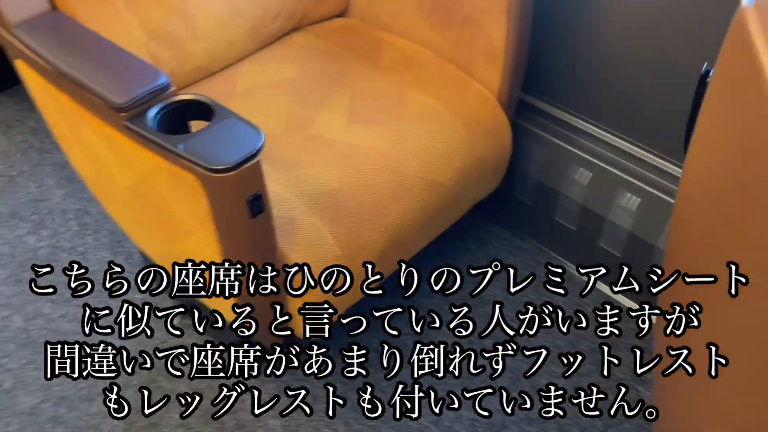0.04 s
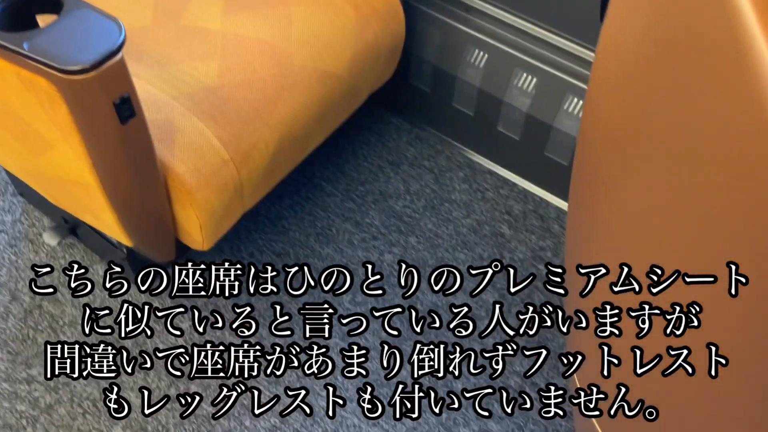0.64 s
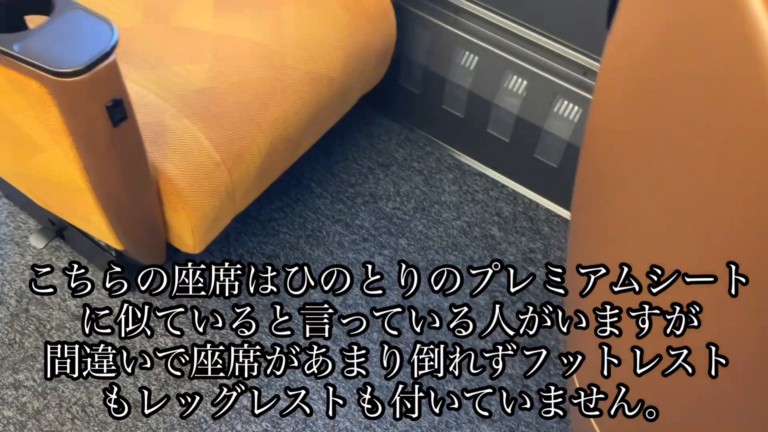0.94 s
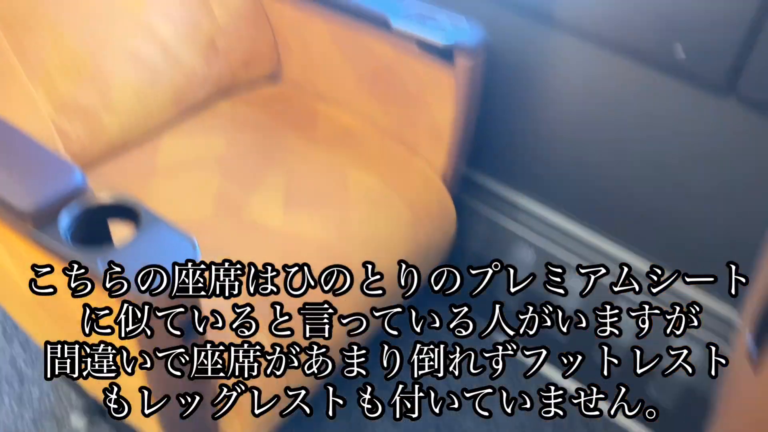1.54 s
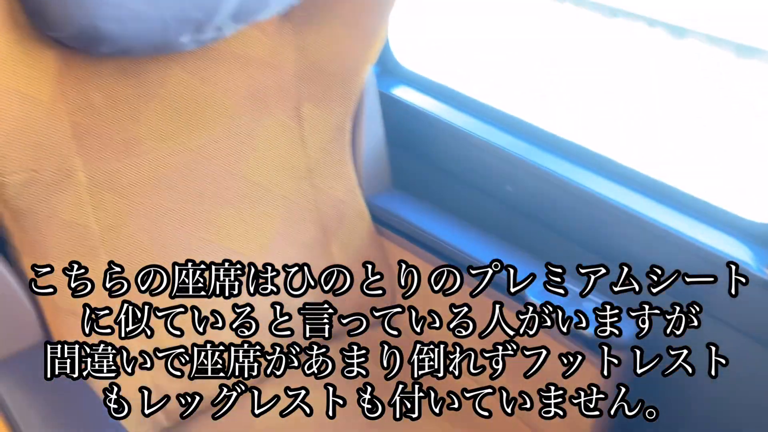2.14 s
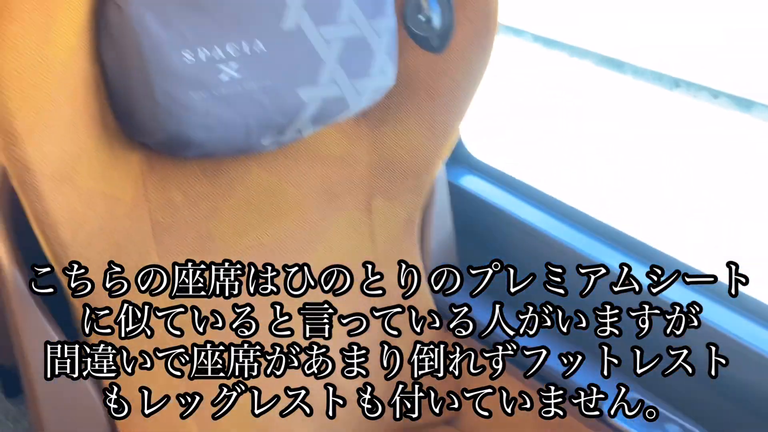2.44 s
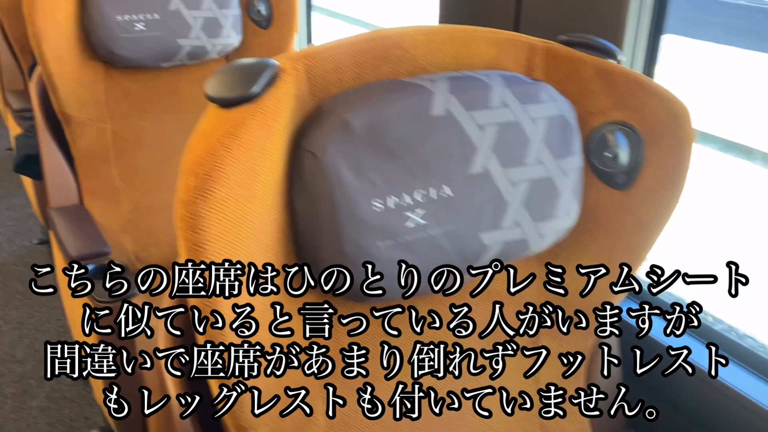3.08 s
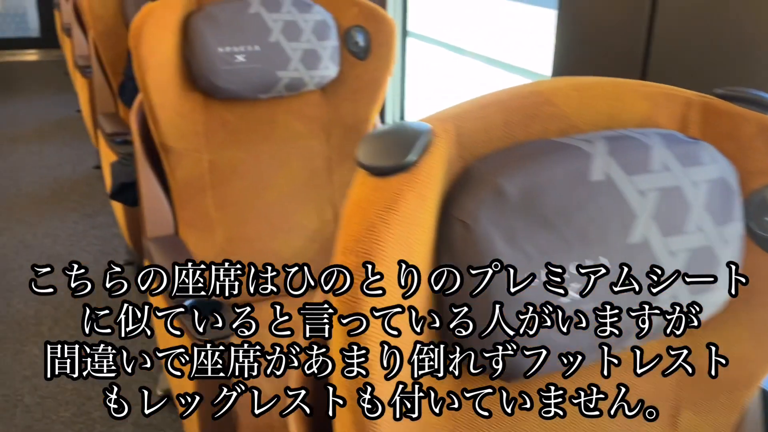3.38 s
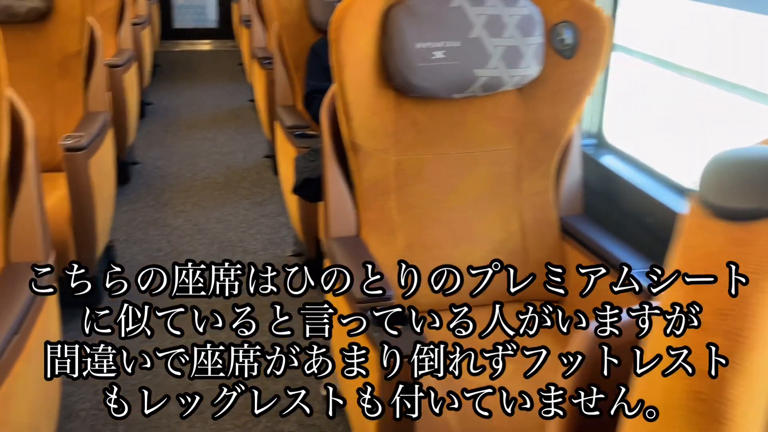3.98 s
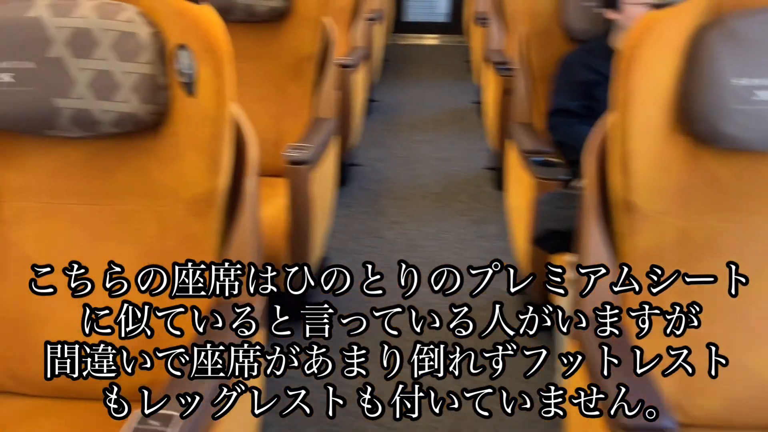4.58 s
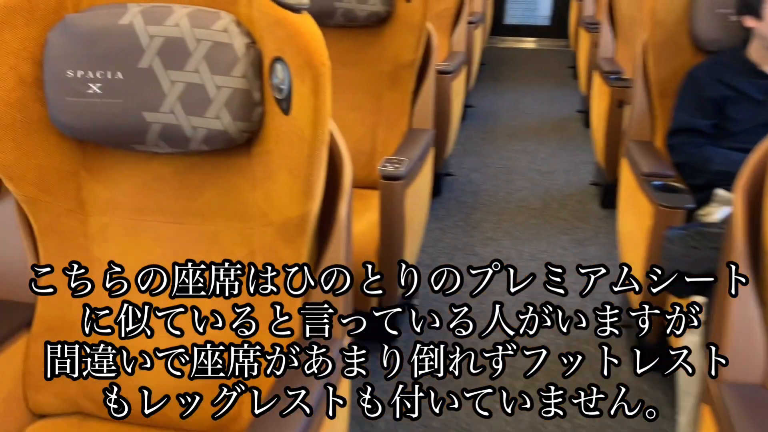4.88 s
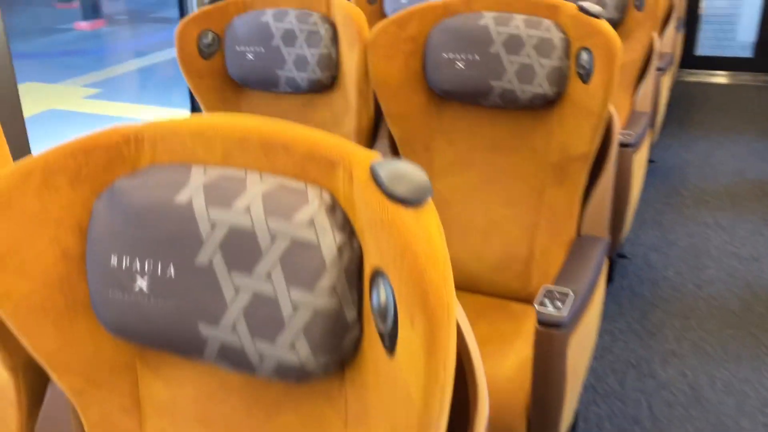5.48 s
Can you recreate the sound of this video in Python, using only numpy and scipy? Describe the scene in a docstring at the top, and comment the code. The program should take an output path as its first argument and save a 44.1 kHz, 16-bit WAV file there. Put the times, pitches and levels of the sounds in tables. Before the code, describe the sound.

A steady low motor hum and ventilation fill a standing train car while clothes rustle and a small zip pull ticks.

```python
"""Inside a standing train car

An onboard motor drones near 59 Hz over the rumble, duct air and fan whine of the ventilation.
Someone moves between the seats: clothes rustle, a small metal zip pull ticks and rings, soft steps
sway the floor, seats squeak and thud, and rubbed upholstery slips in one short rising groan."""
import sys
import numpy as np
from scipy import signal
from scipy.fft import rfft, irfft, next_fast_len
from scipy.io import wavfile
from scipy.ndimage import uniform_filter1d, map_coordinates

SR = 44100
rng = np.random.default_rng(int(sys.argv[2]) if len(sys.argv) > 2 else 0)


def wav_out(sig):
    """Save sig, one row per channel (or a flat mono array), as 16-bit PCM at SR to the path in sys.argv[1]."""
    wavfile.write(sys.argv[1], SR, np.round(np.clip(np.atleast_2d(sig).T, -1, 1) * 32767).astype(np.int16))


N = 243431

# the motor's level and pan along the aisle: time_s, level_db, left_over_right_db
MOTOR_RIDE = [(0.06, -20, 2), (0.87, -21, 2), (3.08, -18, 1), (4.01, -19.5, 1), (4.3, -18.5, 0.5),
              (5.46, -22, 1)]

# Noise colours: freq_hz, relative_db
RUMBLE_EQ = [(20, -26.5), (36, -20), (60, 4), (95, -3), (130, 2.5), (200, -4.5), (260, -7), (330, -8.5),
             (480, -17), (800, -40.5), (2000, -84)]  # the car body
DUCT_EQ = [(150, -40), (250, 0), (450, -2), (700, 2), (850, -4), (1300, -9.5), (2400, -15.5), (3500, -25.5),
           (8000, -44), (16000, -53)]  # air in the ducts
SWISH_EQ = [(300, -55), (500, 1.5), (1100, 3.5), (1700, -0.5), (2350, -1), (3100, -5.5), (4600, -5.5),
            (7000, -26), (12000, -47.5)]  # cloth sliding on cloth
FIZZ_EQ = [(1000, -48), (2000, -7), (4000, 2), (7500, 6), (10500, 2.5), (12200, 0), (13500, -0.5),
           (16000, -1.5)]  # fibres catching
BRUSH_EQ = [(300, -11), (650, 7.5), (1500, 0), (4500, -2), (8000, -10.5), (11000, -13.5), (16000, -24)]  # a brushing sleeve
RASP_EQ = [(800, -26), (1250, -13), (1600, 3), (1850, -12), (2200, 5), (2550, 1.5), (2900, -13),
           (4000, -34)]  # a coarse weave dragging
SNAP_EQ = [(800, 1), (3000, -4), (7000, -6.5), (12000, -6), (16000, -7)]  # the zip pull striking
BUFFET_EQ = [(20, -29), (45, 1), (75, 0), (140, -28), (400, -46.5)]  # stirred air
# how alike the cabin's noise is at the two ears: freq_hz, correlation
EAR_LIKENESS = [(60, 1), (130, 0.98), (290, 0.92), (450, 0.81), (640, 0.39), (1200, 0.02), (3000, -0.12)]

# Bell-shaped swells: peak_s, level_db, half_length_s
OUTLET_SWELLS = [(3.33, -44, 0.023), (3.5, -50, 0.035), (3.68, -48, 0.056), (4.63, -49, 0.056),
                 (4.87, -49, 0.083)]  # the fan whine surfaces at each passing outlet
SLEEVE_STROKES = [(.338, -48.5, 0.015), (.458, -46, 0.025), (.965, -43, 0.011), (1.032, -44, .011),
                  (1.19, -47, 0.015), (1.668, -50, 0.0087), (2.26, -46.5, 0.021), (2.37, -52, 0.0091),
                  (3.262, -50, 0.0069), (4.525, -57, 0.019)]  # quick brushes of a sleeve
SEAT_SCRAPE = [(3.1, -46.5, 0.042)]  # a scrape along a seat back
WEAVE_DRAGS = [(3.77, -55, 0.1), (4.03, -58, 0.089), (4.92, -51, 0.035), (5.04, -52.5, 0.061),
               (5.2, -53, 0.08), (5.45, -64, .06)]  # coarse cloth drags along the aisle seats
SEAT_PUSHES = [(4.578, -24, 0.012), (4.638, -25, 0.021), (4.695, -18.5, 0.017), (4.723, -12.5, 0.02)]  # pushes against the upholstery
FOOTFALLS = [(.222, -24, 0.034), (3.97, -32, .06)]  # soft steps on carpet
AIR_PUFF = [(4.07, -36, 0.028)]  # air stirred by walking

# turns of the body: peak_s, swish_db, half_length_s, fizz_over_swish_db
BODY_TURNS = [(0.013, -45, 0.082, -6), (0.225, -51.5, 0.21, -2), (0.533, -50, 0.041, -5.5),
              (1.018, -51, 0.1, -6), (1.194, -44.5, 0.039, -11), (1.723, -57, 0.056, 6.5),
              (1.98, -55, 0.47, -1), (2.316, -55.5, 0.087, -5), (2.978, -50, 0.099, -3.5),
              (3.1, -50.5, 0.074, 0), (3.36, -58.5, 0.065, 3), (3.998, -49, 0.1, -3),
              (4.666, -54.5, 0.18, -2), (4.92, -47.5, 0.049, -1), (5.052, -47.8, 0.071, 0),
              (5.257, -53, 0.16, 1.5), (5.502, -48, 0.045, -1.5)]
# the body holds still and the cloth's whisper ducks: centre_s, share_removed_db, half_length_s
LULLS = [(.77, -6.5, 0.089), (1.4, -13, .08), (2.69, -10, 0.033)]
# creaks of stiff fabric: peak_s, level_db, half_length_s, resonance_hz, bandwidth_hz
FABRIC_CREAKS = [(0.342, -49.5, .009, 5000, 2400), (.454, -48.5, .012, 5300, 2400),
                 (.955, -58, 0.012, 12100, 350), (1.217, -43, .018, 680, 400),
                 (1.536, -54.5, 0.0077, 7300, 2500), (1.669, -47, 0.0088, 7560, 2600),
                 (1.67, -51, .01, 14500, 5000), (2.37, -59, 0.0045, 4600, 2600),
                 (2.372, -51, .009, 1900, 1600), (2.373, -52, .01, 14300, 4000),
                 (2.613, -54.5, 0.021, 6900, 2600), (2.632, -56, 0.012, 3450, 500),
                 (2.807, -49, 0.012, 8150, 2600), (2.808, -48.5, .011, 2640, 2600),
                 (3.066, -50.5, 0.014, 2740, 350), (3.105, -47, 0.034, 1130, 280),
                 (3.107, -50.5, 0.019, 3000, 1200), (3.09, -51.5, 0.045, 13900, 5000),
                 (3.23, -56, .014, 7800, 1400), (3.263, -49, 0.0071, 1700, 1800),
                 (3.294, -51.5, 0.012, 7600, 3000), (3.42, -57, 0.0084, 10400, 2500),
                 (4.526, -53, 0.02, 8900, 2000), (5.02, -50, .07, 1150, 700)]

# contacts of the zip pull: start_s, snap_db, ring_db, brightness_db
ZIP_HITS = [(0.045, -27, -50, 2), (0.0623, -45, -60, 4), (0.16, -38, -59, 16.5), (0.1713, -37, -40.5, 6),
            (.3177, -45, -58, 5), (0.4958, -36, -50, 9), (0.7062, -31.5, -55, -8), (.747, -42, -68, 1),
            (0.866, -40.5, -61, 12), (1.1227, -36, -53, 6), (1.139, -40, -56, 10), (1.1487, -45, -58, 13),
            (1.6587, -38, -57, 4), (2.363, -35.5, -53, 5), (2.792, -46, -58, 6), (2.796, -37, -49.5, 6),
            (3.0183, -44, -62, 15), (3.38, -42, -64, 4), (3.603, -45, -64, 6), (5.128, -40, -64, 10),
            (5.456, -43, -44, -1)]
# the pull's ringing modes: pitch_hz, relative_db, t60_s
ZIP_MODES = [(5030, -1.5, 0.039), (9500, -15, .03), (11900, -2, 0.084), (12220, 5.5, 0.037),
             (13300, -10, .035), (14300, -17, .03)]
# after a hard contact the pull swings free until cloth stops it: start_s, level_db, free_for_s
ZIP_SWINGS = [(.172, -40.5, .135), (.496, -53.5, .12)]

# what the seat padding lets through: freq_hz, gain_db
PADDING_EQ = [(100, -4.5), (150, -0.5), (200, 0), (270, -5), (320, -17), (420, -30), (700, -43)]
# Short seat notes: peak_s, level_db, half_length_s, pitch_hz
SEAT_SQUEAKS = [(3.062, -47.5, 0.026, 1696), (3.105, -44.5, 0.028, 558), (3.11, -46, 0.015, 1210)]  # the scrape sticks and slips
ARM_BUMPS = [(.065, -39.5, 0.021, 347), (.865, -35, 0.012, 263.6), (2.58, -29.5, .018, 129.4),
             (2.735, -28, 0.024, 135.7), (3.11, -37, 0.029, 269), (3.16, -30.5, 0.028, 149.8)]  # an arm knocks the padding


def drone(motor_hz=58.74, drift_hz=0.059, flutter_db=-0.27, octave_db=-48, hum_db=-46):
    """An induction motor turns just under mains frequency; a transformer hums at twice the mains."""
    level_db, pan_db = curves(MOTOR_RIDE)
    phase = 2 * np.pi * np.cumsum(motor_hz + drift_hz * wobble(2.36)) / SR
    motor = amp(level_db + flutter_db * wobble(5.9)) * np.sin(phase)
    octave = amp(octave_db) * np.sin(2 * phase)
    hum = amp(hum_db) * np.sin(2 * np.pi * 120 * clock())
    return panned(np.sqrt(2) * (motor + octave + hum), pan_db)


def ventilation(rumble_db=-32.5, air_db=-47.5, fan_db=-56, blade_hz=730, waver_hz=8):
    """The car body rumbles, air runs through the ducts and the fan blades give a wavering whine."""
    aisle = glide(middle_s=3.88, scale_s=0.72)  # rumble and air grow from window seat to aisle
    rumble = amp(rumble_db + 1.5 * aisle + 0.4 * wobble(14)) * rush(RUMBLE_EQ, patchy_db=1.12)
    near_wall = swells([(3.42, -43, 0.15), (4.62, -39, 0.1), (5.42, -40, 0.11)])
    cabin_boom = near_wall * whirr(centre_hz=125.5, width_hz=26)
    air = amp(air_db + 4 * aisle) * rush(DUCT_EQ, patchy_db=2.5)
    # the whine reaches each ear by its own changing paths
    blades = np.array([amp(wobble(20)) * sine(blade_hz + waver_hz * wobble(40)) for ear in range(2)])
    whine = unit(blades) + amp(-5.5) * whirr(centre_hz=702, width_hz=42)
    fan = np.hypot(amp(fan_db), swells(OUTLET_SWELLS)) * whine
    return panned(rumble + cabin_boom, db=0.5) + panned(air + fan, db=2.5)


def clothes(rest_swish_db=-56, rest_fizz_db=-57.5):
    """Cloth swishes and its fibres fizz as the body turns; a sleeve brushes, creaks and rasps."""
    restless = 1 - swells(LULLS)
    swish_swells = swells([(s, db, half) for s, db, half, _ in BODY_TURNS])
    fizz_swells = swells([(s, db + over, half) for s, db, half, over in BODY_TURNS])
    sliding = np.hypot(restless * amp(rest_swish_db), swish_swells)
    catching = np.hypot(restless * amp(rest_fizz_db), fizz_swells)
    swish = sliding * amp(-0.62 + 0.7 * wobble(16)) * rush(SWISH_EQ, grain_db=2.5, patchy_db=3)
    fizz = catching * amp(-3.5 + 0.71 * wobble(25.95)) * rush(FIZZ_EQ, grain_db=0.5, patchy_db=3)
    brushing = swells(SLEEVE_STROKES) + amp(-2) * swells(SEAT_SCRAPE)
    strokes = brushing * rush(BRUSH_EQ, grain_db=1.5, patchy_db=1.8)
    creaks = sum(swells([(s, db, half)]) * whirr(hz, width) for s, db, half, hz, width in FABRIC_CREAKS)
    rasp = swells(WEAVE_DRAGS) * rush(RASP_EQ, grain_db=4, patchy_db=2.5)
    return panned(swish + fizz + strokes + creaks + rasp, db=-2.5)


def zip_pull(attack_s=0.0002, snap_t60_s=0.006, tail_db=-17, tail_t60_s=0.069, bright_hz=9500,
             sing_hz=9037, sing_t60_s=0.49):
    """Each contact snaps and rings the small metal pull; swinging free, it sings one high note."""
    out = np.zeros((2, N))
    snap = rush(SNAP_EQ, patchy_db=2)
    # the snap's top end, raised or lowered by each hit's brightness_db
    edge = filtered(snap, lambda hz: 1 - 1 / (1 + (hz / bright_hz) ** 6))
    for s, snap_db, ring_db, bright_db in ZIP_HITS:
        start = round(s * SR)
        span = slice(start, min(start + SR // 5, N))
        t = np.arange(span.stop - start) / SR
        for hz, mode_db, t60 in ZIP_MODES:
            phase = 2 * np.pi * (hz * t + rng.random())
            rattle = 0.2 * np.cumsum(rng.standard_normal(len(t)))  # the loose pull blurs each mode
            ring = amp(ring_db + mode_db + rng.normal(0, 0.65) - 60 * t / t60)
            out[:, span] += ring * np.sin(phase + rattle)
        scatter = amp(tail_db - 60 * t / tail_t60_s)  # off the nearby seats
        envelope = (amp(-60 * t / snap_t60_s) + scatter) * (1 - np.exp(-t / attack_s))
        out[:, span] += amp(snap_db) * envelope * (snap[:, span] + (amp(bright_db) - 1) * edge[:, span])
    for s, db, free_s in ZIP_SWINGS:
        t = np.maximum(clock() - s, 0)
        choke = 1 - glide(s + free_s, scale_s=0.006)
        out += amp(db - 60 * t / sing_t60_s) * choke * np.sin(2 * np.pi * sing_hz * t)
    return out


def seat_groan(creep_hz=99, slide_hz=234.4, jitter=0.017, rough_db=2, ear_lag_s=0.0003):
    """Upholstery creeps, then gives way and slips faster; the padding passes only low harmonics."""
    slip_hz = creep_hz + (slide_hz - creep_hz) * glide(middle_s=4.693, scale_s=0.0229)
    phase = 2 * np.pi * np.cumsum(slip_hz * (1 + jitter * wobble(120))) / SR
    slips = sum(amp(along(PADDING_EQ, k * slip_hz)) * np.sin(k * phase) for k in (1, 2, 3))
    left = swells(SEAT_PUSHES) * amp(rough_db * wobble(90)) * slips
    # the seat is on the left, so the right ear hears it later and softer
    right = amp(-1.5) * np.interp(clock() - ear_lag_s, clock(), left)
    return np.array([left, right])


def footsteps(floor_hz=41):
    """Soft steps on the carpet set the floor swaying; stirred air buffets each side separately."""
    sway = swells(FOOTFALLS) * sine(floor_hz + 3 * wobble(15.6))
    buffet = unit(filtered(rng.standard_normal((2, N)), lambda hz: amp(along(BUFFET_EQ, hz))))
    return sway + swells(AIR_PUFF) * buffet


def seat_contacts():
    """A rubbed seat back squeaks, differently at each ear; padding answers a bump with a dull note."""
    squeaks = np.array([tones(SEAT_SQUEAKS, waver=0.013, rate_hz=450) for ear in range(2)])
    return squeaks + tones(ARM_BUMPS, waver=0.043, rate_hz=66)


def rush(eq, grain_db=0, patchy_db=0):
    """Diffuse stereo noise of rms 1; grain_db adds tiny catches, patchy_db passing colours."""
    grainy = rng.standard_normal((2, N)) * amp(grain_db * wobble(600))
    spectra = signal.stft(grainy, nperseg=1024)[2]
    patches = uniform_filter1d(rng.standard_normal(spectra.shape[1:]), size=5, axis=0)
    patches = np.clip(unit(uniform_filter1d(patches, size=5, axis=1)), -2, 2)
    pair = signal.istft(spectra * amp(patchy_db * patches), nperseg=1024)[1][:, :N]
    spread = lambda hz: np.arccos(np.clip(along(EAR_LIKENESS, hz), -1, 1)) / 2  # narrow bass, wide top
    mid, side = filtered(pair, lambda hz: amp(along(eq, hz)) * [np.cos(spread(hz)), np.sin(spread(hz))])
    return unit(np.array([mid + side, mid - side]))


def whirr(centre_hz, width_hz):
    """A fuzzy tone: noise in one resonance, different at each ear."""
    noise = rng.standard_normal((2, N))
    return unit(filtered(noise, lambda hz: 1 / (1 + (2 * (hz - centre_hz) / width_hz) ** 2)))


def tones(rows, waver, rate_hz):
    """A short unsteady note for each row; its pitch strays by the share waver."""
    return np.sqrt(2) * sum(swells([(s, db, half)]) * sine(hz * (1 + waver * wobble(rate_hz)))
                            for s, db, half, hz in rows)


def sine(pitch_hz):
    """An oscillator that follows a pitch curve."""
    return np.sin(2 * np.pi * np.cumsum(pitch_hz) / SR)


def swells(rows):
    """A bell-shaped envelope for each (peak_s, level_db, half_length_s) row; overlaps add in power."""
    bells = (amp(db) * np.exp(-0.5 * ((clock() - s) / half) ** 2) for s, db, half in rows)
    return np.sqrt(sum(bell ** 2 for bell in bells))


def glide(middle_s, scale_s):
    """A smooth fade from 0 to 1."""
    return 0.5 + 0.5 * np.tanh((clock() - middle_s) / (2 * scale_s))


def wobble(rate_hz):
    """A smooth random curve with rate_hz knots a second."""
    return map_coordinates(rng.standard_normal(int(N * rate_hz / SR) + 4), [clock() * rate_hz])


def curves(rows):
    """An automation curve for each column after the time."""
    times, *columns = np.transpose(rows)
    return [np.interp(clock(), times, column) for column in columns]


def along(points, hz):
    """Read (freq_hz, value) points on a log frequency axis."""
    freqs, values = np.transpose(points)
    return np.interp(np.log(hz + 1), np.log(freqs + 1), values)


def filtered(x, response):
    """Shape x with a frequency response."""
    size = next_fast_len(N + SR // 2)
    return irfft(rfft(x, size) * response(np.fft.rfftfreq(size, 1 / SR)), size)[..., :N]


def panned(x, db):
    """Make the left channel db louder than the right."""
    return x * amp(np.array([[0.5], [-0.5]]) * db)


def amp(db):
    """Decibels to gain."""
    return 10 ** (np.asarray(db) / 20)


def unit(x):
    """Scale to rms 1."""
    return x / np.sqrt(np.mean(x ** 2) + 1e-20)


def clock():
    """The time of every sample in seconds."""
    return np.arange(N) / SR


def scene():
    """The car's machinery, and the small sounds of someone moving through it."""
    machinery = drone() + ventilation()
    return machinery + footsteps() + seat_groan() + clothes() + seat_contacts() + zip_pull()


def record(dry, split_hz=7600, lag_s=0.000221, top_hz=15800):
    """Above split_hz the left becomes a late, inverted copy of the right; both cut off at top_hz."""
    left, right = dry
    crossfade = lambda hz: np.pi / 2 / (1 + (split_hz / (hz + 1)) ** 26)
    left_lows = filtered(left, lambda hz: np.cos(crossfade(hz)))
    late_highs = filtered(right, lambda hz: np.sin(crossfade(hz)) * np.exp(-2j * np.pi * hz * lag_s))
    return filtered(np.array([left_lows - late_highs, right]), lambda hz: hz < top_hz)


dry = scene()
out = record(dry)
wav_out(out)
```